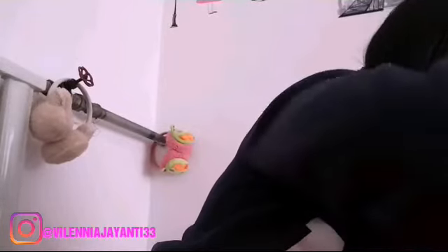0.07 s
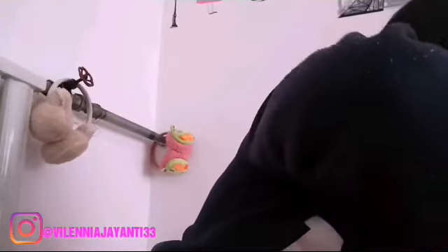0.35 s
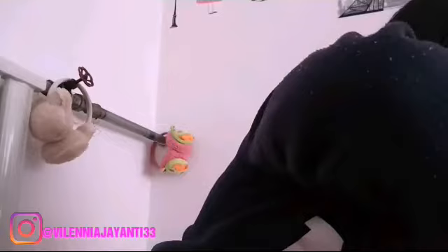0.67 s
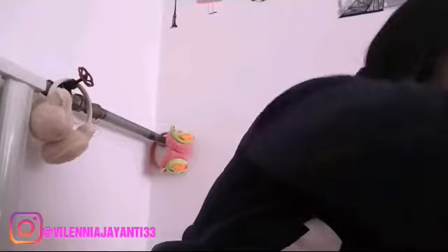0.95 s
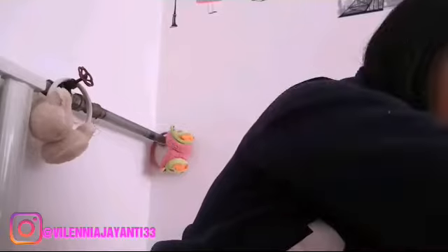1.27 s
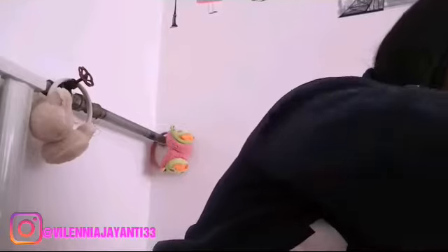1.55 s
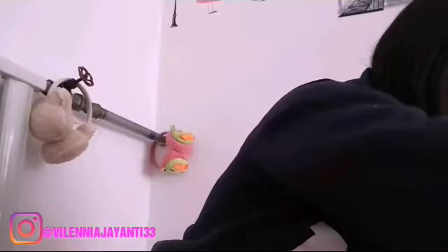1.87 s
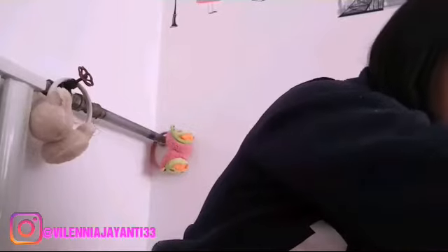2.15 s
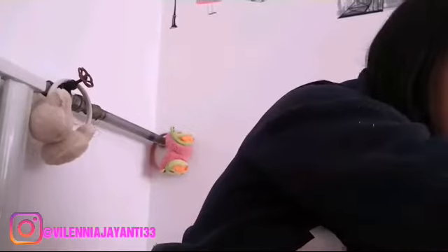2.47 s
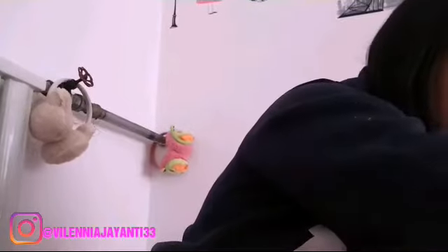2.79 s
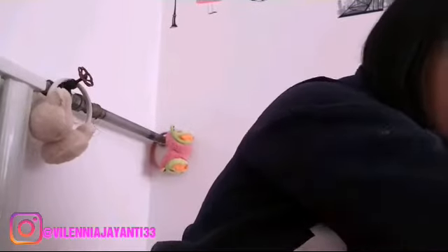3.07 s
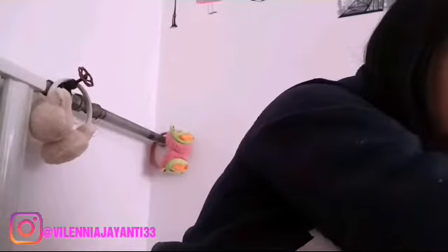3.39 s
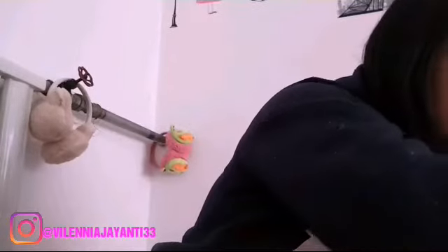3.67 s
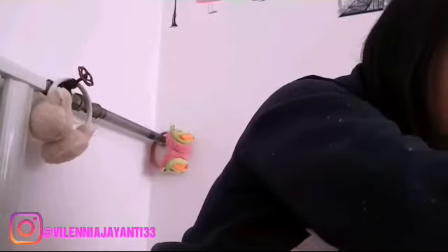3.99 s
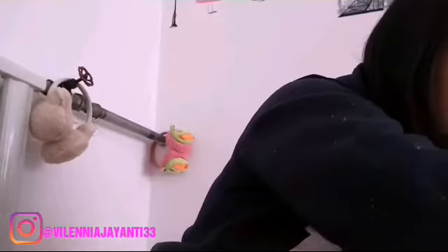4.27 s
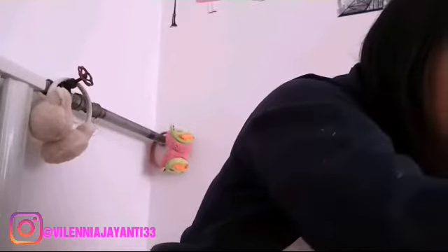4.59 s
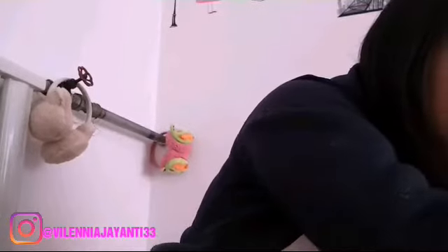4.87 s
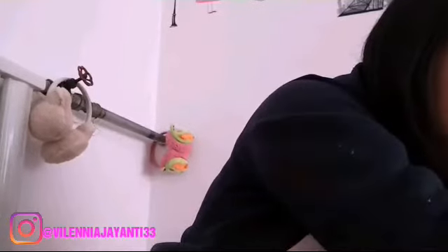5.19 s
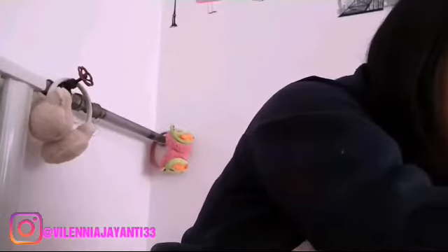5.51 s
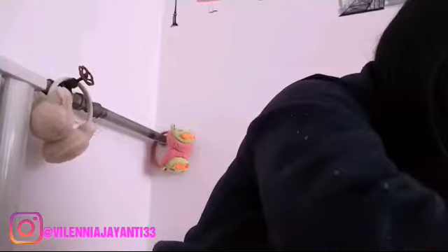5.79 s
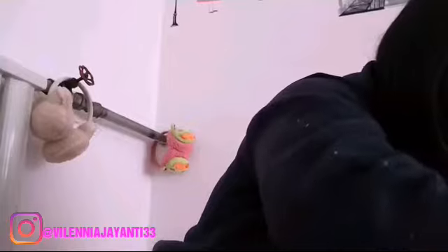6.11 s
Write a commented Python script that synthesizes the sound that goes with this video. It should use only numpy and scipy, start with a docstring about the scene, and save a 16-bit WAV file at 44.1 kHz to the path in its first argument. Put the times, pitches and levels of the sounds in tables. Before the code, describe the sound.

Light, irregular clicks and rattles come from makeup brush handles being pushed around in a container, mixed with soft shuffling and hollow bumps. A brief first stir leads to a longer, denser search, then a short lull and one more flurry that thins into lighter taps. Each click bounces off the walls of a small room, picked up with softened treble and a faint steady hiss.

```python
"""Light clicks and shuffling: someone rummages through makeup brushes in a container.
Hard handles hit each other and ring briefly, or slide with a short scrape. The container gives dull,
hollow knocks, and its contents rustle as the hand stirs them in three spells.
The room is small and bare: a wall throws each click back and the sound rings on over a faint hiss."""
import sys
import numpy as np
from scipy import signal
from scipy.fft import rfft, irfft, next_fast_len
from scipy.io import wavfile
from scipy.ndimage import uniform_filter1d, map_coordinates

SR = 44100
rng = np.random.default_rng(int(sys.argv[2]) if len(sys.argv) > 2 else 0)


def generate_wav(sig):
    """Save sig (samples, or channels by samples) to the path in sys.argv[1] as 16-bit PCM at SR."""
    pcm = np.round(np.clip(np.atleast_2d(sig).T, -1, 1) * 32767).astype(np.int16)
    wavfile.write(sys.argv[1], SR, pcm)


N = 275402

# Handles hitting each other, and a few strong echoes. Each has three tones; room_db adds echo and reverb.
# time_s, low_hz, low_db, middle_hz, middle_db, high_hz, high_db, room_db
HANDLE_HITS = [(0.1438, 2000, -81, 2280, -70, 4480, -58.5, 8),
               (0.2122, 1400, -61.0, 2250.0, -56, 4000, -52, -2),
               (0.2243, 1460, -55.5, 2540.0, -77, 3920, -74, 10.5),
               (0.2689, 1550, -39, 2400, -47.5, 3830, -59, -2.5),
               (0.2746, 1500, -45, 2330.0, -49, 4200, -41.5, -1.5),
               (0.2833, 1350, -42, 2900, -56.5, 3630, -57, -5),
               (0.3, 1570.0, -61.0, 2350, -46.5, 4500, -45.5, -6),
               (0.311, 1600, -57, 2840, -49, 4400, -46, 1), (0.441, 1900, -57.5, 2400, -55, 4400, -59, 8.5),
               (0.4518, 1610, -51, 2740, -53, 4500, -65, 3),
               (0.4884, 1780, -40.5, 2280, -42, 4250, -65, -3),
               (0.5493, 2020, -30.5, 2500, -40, 4900, -44, -10),
               (0.5642, 1860, -32, 2580, -39, 4700, -37, -10),
               (0.639, 1820, -42.5, 2400, -44, 4400, -47.5, -3),
               (0.684, 1830, -73, 2950, -55.5, 4300, -56.5, 3),
               (0.7012, 1820, -60, 2700, -61, 4430, -67, -9),
               (0.772, 1660, -70.0, 2560, -59, 4390.0, -70, -8),
               (0.9331, 1800, -54.5, 2800, -48.5, 4000, -55, 0),
               (0.9663, 1870, -66, 2350, -51, 4740, -56, -2),
               (0.9715, 1520, -53.5, 3130, -52, 4430, -48.5, -14),
               (0.9852, 1515, -54, 3150, -52.5, 4000, -55, -2.5),
               (1.0643, 1600.0, -81, 2760, -68, 4420, -62, 0),
               (1.08, 1870.0, -83, 2440, -66, 3800, -65, -8),
               (1.2427, 1540, -83, 2450.0, -69, 5130, -62, 0), (1.2913, 1730, -80, 2450, -80, 4440, -56, 3),
               (1.318, 1480, -44, 2640, -54, 4300, -45.5, 5.5),
               (1.3289, 1324, -44, 2440, -48.5, 4300, -52, 7.5),
               (1.3596, 1890, -66, 2550, -40, 3960, -37.5, -2),
               (1.3755, 1990, -44, 2230, -59, 4570.0, -46, -8),
               (1.4476, 1560, -68, 2280, -68, 4150, -47, -11),
               (1.4797, 1530, -44, 2380, -50, 3960.0, -56, 3),
               (1.509, 1510, -37, 2110, -40, 4350, -54, 1.5),
               (1.5133, 1250, -50.5, 2450, -56, 4020, -42.5, 9),
               (1.5228, 1550, -38, 2400, -56, 4360, -54, -7), (1.5377, 1770, -46, 2520, -41, 4250, -57, -4),
               (1.5435, 1770, -44, 2370, -42, 4500, -56, -6),
               (1.6226, 1570, -38.5, 2380, -37.5, 3900, -39, 4),
               (1.6291, 1820, -34.5, 2870, -38, 4300, -25.5, -8),
               (1.655, 1680, -45, 2470, -50, 4200, -45, -2), (1.659, 1780, -46, 2440.0, -44, 3940, -32, 1),
               (1.729, 1760, -33, 2340, -36.5, 4420, -30, -9.5),
               (1.7451, 1750, -34.5, 2400, -41, 3670.0, -44, -6),
               (1.7697, 1710, -41.5, 2470, -44, 4040, -44, 0),
               (1.8416, 1740, -46, 2300, -40, 3880, -56, -11),
               (1.8538, 1450, -42.5, 2320, -44, 4220, -58, 6),
               (1.872, 1930, -41, 2420, -53, 4560, -42, 1.0),
               (1.8766, 1410, -40, 2470, -39.5, 4030, -35, 4), (1.91, 1430, -59, 3120, -40, 4130, -47, 2),
               (2.0273, 1890.0, -51, 2400, -48, 4280, -50.5, 1),
               (2.1303, 1527, -32, 2090, -31, 3840, -39, -4), (2.1458, 1770, -31, 2320, -50, 3550, -37, -4),
               (2.153, 1780, -42, 2300, -51, 3660, -55, -5), (2.1646, 1580, -40, 2200, -48, 3750, -45, -1),
               (2.2277, 1400, -46.5, 2430.0, -50, 3760, -39, -1.5),
               (2.2894, 1503, -35.5, 2240, -32.5, 4270, -29, -5),
               (2.304, 1510, -37, 2350, -50, 4400, -47, -4.5),
               (2.3387, 1380, -57, 2400, -61, 3940, -38.5, -3),
               (2.4813, 1720, -59.0, 2750, -48, 3880, -36.5, -14),
               (2.4954, 1790, -46, 3180, -41, 3900, -57, -1), (2.55, 1800, -47, 2780, -47, 4680, -38, -1),
               (2.572, 1780, -38.5, 2290, -39.5, 4320.0, -45, -2),
               (2.5842, 1640, -45, 2660.0, -48, 3990, -34, -1),
               (2.6132, 1880.0, -59, 2730, -40, 3870, -42, 6),
               (2.6204, 1920, -48, 2520, -43, 3980, -28, -7), (2.623, 1900, -46, 2670, -49, 4110, -26, -4),
               (2.63, 1490, -41, 2700, -47, 4550, -39, -1),
               (2.6382, 1540, -40.5, 2680, -41, 4170, -40.5, 4.5),
               (2.7289, 2000, -38, 2400, -40.5, 4100, -43, -5),
               (2.801, 1780, -45, 2510.0, -57, 4400, -68, -1),
               (2.8478, 1980, -32, 2580.0, -32, 3870, -33, -4),
               (2.8571, 1700, -33, 2370, -31.5, 4190, -26, -7),
               (2.8634, 1660, -67, 2800, -36, 3590, -31.5, 2),
               (2.8741, 1470, -36.5, 2820, -45, 4150, -34, -4.5),
               (2.9428, 1950, -72, 2760, -52, 3820, -37.5, 4),
               (3.1161, 1500, -42.5, 2360, -48, 4300, -44.5, 1),
               (3.145, 1760, -43.5, 2330, -57, 4330, -63, -4), (3.17, 1840, -65, 2540, -32, 3920, -26, -4),
               (3.1868, 1900, -58, 3330, -29, 3600, -37, -2),
               (3.3243, 1695, -43.5, 2360.0, -50, 4300, -62, 9.5),
               (3.329, 1370, -40.5, 2640, -58, 4460, -66, 5),
               (3.3424, 1400, -33.5, 2480, -39, 4600, -66, 3),
               (3.3507, 1250, -42, 2670, -42, 3470, -54, -2),
               (3.3574, 1470, -31.5, 2970, -50, 3540, -52, -9),
               (3.408, 1230, -41.5, 2740, -46, 3660, -36.5, 2.5),
               (3.528, 1530, -44.5, 2500, -51, 4350, -50, -3),
               (3.569, 2060, -47.5, 2450.0, -51, 4500, -50, -10),
               (3.645, 1390, -64, 2530, -69, 4460, -51.5, 2.5),
               (3.7363, 1500, -64, 2470, -67, 4350, -60, 3), (3.7827, 1410, -62, 2440, -61.5, 4030, -60, 7),
               (3.815, 1450, -48, 2720, -58.5, 4320, -38, -4),
               (3.855, 1390, -61, 2680, -40.5, 4010, -37, 6),
               (3.8737, 1650, -48, 2530, -37, 4200, -35, -12),
               (3.9045, 1990, -40, 2270, -37, 4050, -29.5, -3.5),
               (4.1212, 1690, -84, 3000, -47.5, 4370, -49, -2),
               (4.1791, 2000, -61, 2530, -55, 3930, -68.5, 2), (4.326, 1530, -91, 2640, -64, 3860, -63, 3),
               (4.3402, 2036, -79.5, 2340.0, -68, 4020, -62, -8),
               (4.6918, 1480, -51.5, 2430, -53, 4700, -47, 5.5),
               (4.7224, 1940, -48, 2670.0, -47, 3540, -47, -6.0),
               (4.7273, 1930.0, -64, 2320, -42.5, 3920, -36.5, -4.5),
               (4.823, 1840, -55.5, 2400, -60, 3960.0, -64, -5),
               (4.873, 1550, -49.5, 2400, -79, 4630, -49.5, -10),
               (4.887, 1320, -51, 2260.0, -89, 4130, -60, -1),
               (4.9125, 1730, -56, 2380, -67, 5220, -52.5, 1),
               (4.95, 1820, -56, 2300, -61, 4220, -43.5, -1.5), (5.016, 1810, -72, 2630, -57, 5280, -53, 0),
               (5.066, 1890.0, -67, 2800, -66, 4890, -43, -4.5),
               (5.133, 1400, -51, 2300.0, -57, 4400, -64, 5), (5.1434, 1480, -58, 2620, -72, 4470, -47, -5),
               (5.163, 1890, -57, 2250.0, -58, 4660, -53, 4),
               (5.2075, 1600, -54, 2220, -56, 4140, -43.5, 3),
               (5.237, 1430, -52, 2630, -34.5, 4430, -31.5, 1.5),
               (5.252, 1400, -35, 2430, -43, 4460, -44, -2), (5.2572, 1510, -54, 2830, -44, 4600, -35, -17),
               (5.274, 1540, -40, 2720, -31, 4100, -26.5, -11),
               (5.29, 1420, -40, 2760, -47, 4000, -51, -1.5),
               (5.3055, 1550, -38, 2650, -40.5, 4300, -55, -1),
               (5.4427, 1400.0, -57, 2400, -64, 3700, -44.5, -20),
               (5.4563, 1820, -61, 2750.0, -53, 3770, -43, -19),
               (5.484, 1570, -40, 2680, -50, 3880, -32.5, -5),
               (5.498, 1505, -37.5, 2700, -49, 4100, -49, -1.5),
               (5.5339, 1490, -48, 2820, -48, 4470.0, -55, 4),
               (5.8289, 1980, -51, 2660, -42, 3730, -47, 3.5),
               (5.832, 1970.0, -53, 2520, -51, 4040, -43, -2.0),
               (5.841, 1700, -63, 2480, -63, 4380, -42.5, -14),
               (5.8648, 1700, -68, 2710.0, -62, 4700, -42, -1),
               (5.881, 1560.0, -69, 3070, -49, 4140, -51, 0),
               (5.9062, 1840, -66, 2770, -44, 4840, -38.5, -3.5),
               (5.924, 1750, -58, 2370, -55, 4280, -44, 4.5),
               (6.02, 1700, -75, 2280, -46, 3900.0, -43, -16),
               (6.0651, 1830.0, -69, 2440, -52, 3800, -47, -19),
               (6.0804, 2020, -57.5, 2300, -51, 4010.0, -65, 2),
               (6.1261, 1770, -67, 2500, -63, 4200, -41, -9)]
# The tones at which the hollow container rings: pitch_hz, width_hz, level_db
CONTAINER_TONES = [(135, 41, -6.5), (203.4, 26, -2), (271, 50.5, -3.5), (353, 91, 0), (483, 353, -5.5),
                   (831, 132, -4.5), (1390, 410, -9.5)]
# The tones at which the loose handles ring: pitch_hz, width_hz, level_db
HANDLE_TONES = [(1386, 138, -8), (2005, 260, -3), (2740, 1840, -5), (3725, 676, 1), (4696, 383, -1.5)]
TYPICAL_HIT_DB = -40  # hits count as hard or soft compared with this


def amp(db):
    """Turn decibels into a gain to multiply by."""
    return 10 ** (np.asarray(db) / 20)


def unit(x):
    """Scale x to an average (rms) level of 1."""
    return x / np.sqrt(np.mean(x ** 2) + 1e-20)


def levelled(x, span_s):
    """Give x the energy of a sound that holds level 1 for span_s."""
    return x / np.sqrt(np.sum(x ** 2) / (span_s * SR) + 1e-20)


def along(points, hz):
    """Read between (pitch_hz, value) points on a log pitch scale."""
    pitches, values = np.transpose(points)
    return np.interp(np.log(hz + 1), np.log(pitches), values)


def add(track, start_s, sound):
    """Mix a sound into the track."""
    i = max(round(start_s * SR), 0)
    track[i:i + len(sound)] += sound[:len(track[i:])]


def filtered(x, response):
    """Multiply each frequency in x by response(hz)."""
    size = next_fast_len(len(x) + 8192)
    return irfft(rfft(x, size) * response(np.fft.rfftfreq(size, 1 / SR)), size)[:len(x)]


def resonate(x, tones):
    """Pass x through an object that rings at these (pitch_hz, width_hz, level_db) tones."""
    return filtered(x, lambda f: sum(
        (-1) ** k * amp(db) * 1j * f * width / (hz * hz - f * f + 1j * f * width)
        for k, (hz, width, db) in enumerate(tones)))


def cut_bass(x, corner_hz=800):
    """Small objects give off little bass."""
    return signal.sosfilt(signal.butter(2, corner_hz, "highpass", fs=SR, output="sos"), x)


def causal(gain):
    """A filter with this gain that never rings ahead of the sound (minimum phase)."""
    cepstrum = irfft(np.log(np.maximum(gain, 1e-6)))
    half = len(cepstrum) // 2
    cepstrum[1:half] *= 2
    cepstrum[half + 1:] = 0
    return np.exp(rfft(cepstrum))


def ring(hz, fade_s, attack_s, t):
    """A tone that starts softly and falls 60 dB in fade_s."""
    tone = np.sin(2 * np.pi * (hz * t + rng.random()))
    return tone * amp(-60 * t / fade_s) * (1 - np.exp(-t / attack_s))


def burst(hz, swell_s, t):
    """A tone only a few cycles long, loudest at twice swell_s."""
    tone = np.sin(2 * np.pi * (hz * t + rng.random()))
    return tone * (t / swell_s) ** 2 * np.exp(-t / swell_s)


def ticks(per_s, spread_db):
    """Tiny touches of uneven size at random times."""
    size = amp(spread_db * np.minimum(rng.standard_normal(N), 2))
    return (rng.random(N) < per_s / SR) * size * rng.choice([-1, 1], N)


def wobble(per_s):
    """A smooth curve through per_s random values a second."""
    return map_coordinates(rng.standard_normal(1024), [np.arange(N) * per_s / SR], mode="wrap")


def air():
    """The still room's faint, steady hiss."""
    # The colour of the hiss: pitch_hz, level_db
    hiss_colour = [(25, -1), (120, -1.5), (300, -5), (900, -15.5), (1500, -15), (3000, -13.5), (4400, -1),
                   (5500, -24.5), (8000, -6.5), (14000, -2)]
    return amp(-67.0) * unit(filtered(rng.standard_normal(N), lambda hz: amp(along(hiss_colour, hz))))


def room_tail(clump_db=3):
    """Reverb: reflections arrive in clumps, and each pitch fades at its own speed."""
    # How long the room takes to fade by 60 dB: pitch_hz, fade_s
    fade_times = [(120, 0.3), (400, 0.31), (1500, 0.42), (4000, 0.31), (7000, 0.47), (9500, 0.25)]
    hz, t, spectrum = signal.stft(rng.standard_normal(int(SR * .8)), SR, nperseg=256)
    tail = signal.istft(spectrum * amp(-60 * t / along(fade_times, hz)[:, None]), SR, nperseg=256)[1]
    # little comes back before the nearest walls answer
    tail *= np.interp(np.arange(len(tail)) / SR, [0, .012, .017, .035], [.3, .35, .85, 1])
    tail *= amp(clump_db * unit(uniform_filter1d(rng.standard_normal(len(tail)), size=90)))
    return tail / np.linalg.norm(tail)


def in_room(x, reverb_db):
    """Add reverb to x; every spot in the room has a different tail."""
    response = amp(reverb_db) * room_tail()
    response[0] += 1
    return signal.fftconvolve(x, response)


def scatter(spread_s, share):
    """The direct path, then a spray of reflections off nearby surfaces."""
    t = np.arange(SR // 50) / SR
    spray = rng.standard_normal(len(t)) * np.exp(-t / spread_s) * (1 - np.exp(-t / spread_s)) ** 2
    path = share * spray / np.linalg.norm(spray)
    path[0] += 1
    return path


def rolling(x, depth_db=3.5):
    """As the handles roll and touch elsewhere, their tones come and go."""
    spectrum = signal.stft(x, nperseg=512)[2]
    drift = uniform_filter1d(rng.standard_normal(spectrum.shape), size=4, axis=0)  # smooth over pitch
    drift = uniform_filter1d(drift, size=8, axis=1)  # and over time
    return unit(signal.istft(spectrum * amp(depth_db * unit(drift)), nperseg=512)[1][:N])


def jostle(per_s, spread_db, swell_s, detune=.09):
    """Light taps, each on a handle of a slightly different pitch."""
    track, t = np.zeros(N), np.arange(SR // 80) / SR
    for start_s in np.arange(0, N / SR, 1 / per_s):
        hz, _, db = HANDLE_TONES[rng.integers(len(HANDLE_TONES))]
        size = amp(db + spread_db * min(rng.standard_normal(), 1.5))
        late_s = rng.random() / 20
        pitch_hz = hz * (1 + detune * rng.uniform(-1.6, 1))
        add(track, start_s + late_s, size * burst(pitch_hz, swell_s, t))
    return unit(track)


def nudges(t, rise_s=0.0036, fall_s=0.0063, growth=0.94):
    """A gain that peaks around each hit, as it disturbs the handles next to it."""
    gain = np.zeros(N)
    around = t[:SR // 8] - t[SR // 16]
    shape = np.exp(np.where(around < 0, around / rise_s, -around / fall_s))
    for time_s, *tones, _ in HANDLE_HITS:
        force_db = max(tones[1::2]) - TYPICAL_HIT_DB
        # growth below 1 gives soft hits a larger share of scrape
        add(gain, time_s + around[0], amp(growth * force_db) * shape)
    return gain


def shuffle(fidget_db=1):
    """The hand drags handles over each other and along the container, resting between spells."""
    # Three spells of stirring, each a list of: time_s, container_db, handles_db
    spells = [
        [(0, -90, -67), (.13, -73, -58), (.236, -51, -62.5), (.37, -93, -67), (.508, -69.5, -50),
         (.76, -62.5, -63.5)],
        [(1.14, -106, -74), (1.37, -60, -61), (1.52, -52.5, -47), (1.79, -53.5, -42.5), (2.08, -58, -60.5),
         (2.68, -48, -39.5), (2.8, -63.5, -52), (3.08, -68.5, -54), (3.39, -47, -42.5), (3.59, -55.5, -53),
         (3.72, -79, -66), (3.95, -49, -44.5), (4.12, -73, -59.5), (4.41, -79.5, -66)],
        [(4.61, -77.5, -69), (4.7, -64.5, -57.5), (4.95, -69, -59), (5.25, -49.5, -51.5), (5.55, -68.5, -48),
         (5.7, -60, -60), (5.88, -59.5, -64), (6, -57, -53.5), (6.24, -84, -58)],
    ]
    t, container_gain, handle_gain = np.arange(N) / SR, 0, 0
    for spell in spells:
        times, container_db, handles_db = np.transpose(spell)
        moving = (t >= times[0]) & (t <= times[-1])
        container_gain += moving * amp(np.interp(t, times, container_db))
        handle_gain += moving * amp(np.interp(t, times, handles_db))
    fidget = amp(fidget_db * wobble(per_s=22.04))  # the hand is unsteady
    nudge = nudges(t)
    container_gain = container_gain * fidget + amp(-56.5) * nudge
    handle_gain = handle_gain * fidget + amp(-46) * nudge
    rub = amp(-6.5) * rolling(resonate(ticks(per_s=600, spread_db=9.5), CONTAINER_TONES))
    scrape = amp(-8.0) * rolling(resonate(ticks(per_s=340, spread_db=3.5), HANDLE_TONES))
    taps = amp(-17.0) * jostle(per_s=260, spread_db=5, swell_s=.0006)
    stray_taps = amp(-19.5) * jostle(per_s=30, spread_db=3, swell_s=.0005)
    return in_room(container_gain * rub + handle_gain * (scrape + taps + stray_taps), reverb_db=-2.0)[:N]


def slides(width_hz=520):
    """One handle sticks and slips along another, which keeps one of its tones sounding."""
    # Short sliding strokes: start_s, length_s, pitch_hz, level_db
    strokes = [(0.039, 0.12, 1520, -70.5), (0.364, 0.094, 1050, -68), (0.422, 0.054, 795, -59),
               (1.181, 0.097, 1680, -66), (0.917, 0.043, 3000, -60), (1.301, 0.054, 2040, -52),
               (3.141, 0.027, 1730, -49.5), (4.856, 0.058, 1460, -59), (4.852, 0.04, 770, -60.5),
               (4.893, 0.08, 1040, -60), (5.159, 0.19, 1410, -48.5)]
    track = np.zeros(N)
    for start_s, length_s, hz, db in strokes:
        count = int(length_s * SR)
        slips = ticks(per_s=690, spread_db=-1.0)[:count]
        tone = [(hz, width_hz, 0)]
        scrape = unit(resonate(resonate(slips, tone), tone))
        add(track, start_s, amp(db) * np.hanning(count) * scrape)
    return in_room(track, reverb_db=-5.5)[:N]


def knocks(swell_cycles=0.56, fade_s=0.13):
    """A bump pushes the container for a few low cycles and shakes its hollow tones."""
    # Bumps on the container: time_s, pitch_hz, push_db, hollow_db
    bumps = [(0.172, 315, -52, -54), (0.214, 284, -52, -64), (0.271, 322, -50.5, -51), (.31, 277, -55, -79),
             (.509, 293, -39.5, -45), (0.563, 497, -52, -67), (.94, 200, -65.5, -62),
             (1.338, 336, -40.5, -43.5), (1.359, 261, -40, -48.5), (1.518, 300, -43, -49.5),
             (1.543, 184, -42, -58), (1.622, 310, -44.5, -55), (1.65, 334, -44, -46), (1.77, 540, -41, -48),
             (1.834, 343, -57, -45.5), (1.879, 337, -45, -50), (1.93, 354, -46.5, -52),
             (2.129, 500, -48, -47), (2.314, 219, -42, -53), (2.453, 298, -46.5, -50.5),
             (2.552, 326, -49.5, -51), (2.691, 250, -55, -55.5), (2.859, 580, -46.5, -67),
             (2.942, 378, -44, -43.5), (3.207, 306, -50.5, -55), (3.333, 280, -41, -40.5),
             (3.352, 300, -44, -36.5), (3.381, 238, -43.5, -50), (3.55, 294, -55, -54),
             (3.814, 330, -63, -56), (3.854, 370, -36.5, -37.5), (3.907, 286, -50.5, -45),
             (3.946, 407, -60, -46.5), (3.99, 200, -52, -50), (4.04, 241, -65, -58),
             (4.706, 224, -50.5, -52), (4.826, 330, -64.5, -61), (5.253, 296, -39.5, -45.5),
             (5.295, 340, -48.5, -73), (5.457, 320, -49.5, -77), (5.495, 305, -53, -45.5),
             (5.758, 347, -64, -74), (5.875, 404, -50.5, -57), (5.929, 290, -52, -66),
             (6.098, 135, -57.5, -66)]
    track, t = np.zeros(N), np.arange(SR // 8) / SR
    for time_s, hz, push_db, hollow_db in bumps:
        swell_s = swell_cycles / hz
        push = amp(push_db) * levelled(burst(hz, swell_s, t), span_s=0.0027)
        shake = rng.standard_normal(len(t)) * amp(-60 * t / fade_s)
        hollow = amp(hollow_db) * levelled(resonate(shake, CONTAINER_TONES), span_s=0.006)
        add(track, time_s - swell_s, in_room(cut_bass(push + hollow, corner_hz=75), reverb_db=-3.5))
    return track


def rings(attack_s=0.00026):
    """After a blow, a loose handle or the container holds one note for a moment."""
    # Notes that ring on freely: start_s, pitch_hz, level_db, fade_s
    notes = [(0.267, 1580, -36, 0.039), (.5, 3410, -46, 0.27), (.55, 3470, -47, 0.32),
             (.638, 1814, -36.5, 0.032), (1.361, 129, -40.5, 0.068), (1.655, 141, -40, 0.043),
             (1.77, 572, -29.5, 0.017), (2.606, 202, -46, 0.1), (2.621, 6820, -32.5, .035),
             (2.939, 3150, -49, 0.36), (3.186, 3440, -41, 0.055), (3.356, 197, -40, 0.12),
             (3.856, 1322, -44, 0.13), (3.909, 1120, -40.5, 0.055), (5.249, 148, -40.5, 0.061),
             (5.273, 2720, -27, .039), (5.274, 4300, -24, .008), (5.287, 1440, -34.5, 0.08),
             (5.288, 1315, -45, 0.094), (6.1243, 4660, -31, 0.013)]
    track, t = np.zeros(N), np.arange(SR // 2) / SR
    for start_s, hz, db, fade_s in notes:
        add(track, start_s, in_room(amp(db) * ring(hz, fade_s, attack_s, t), reverb_db=-5.5))
    return track


def clicks(swell_s=.00047, note_db=-4.5, grate_db=-10, crack_db=-9, hardness=0.44, echo_delay_s=0.012):
    """Each hit rings three short tones of a handle with a sharp crack, and a wall throws it back."""
    track, t = np.zeros(N), np.arange(SR // 40) / SR
    rise_s = 2 * swell_s
    for time_s, *tones, room_db in HANDLE_HITS:
        pitches, levels = tones[::2], tones[1::2]
        path, click = scatter(spread_s=.0015, share=.28), 0
        for hz, db in zip(pitches, levels):
            strike = unit(burst(hz, swell_s * np.sqrt(2000 / hz), t))  # higher tones are quicker
            note = amp(note_db) * unit(ring(hz, fade_s=.024, attack_s=rise_s, t=t))
            tone = signal.fftconvolve(strike + note, path)[:len(t)]
            click += amp(db) * levelled(tone, span_s=0.0037)
        grate_noise, crack_noise = rng.standard_normal((2, len(t))) * t * np.exp(-t / rise_s)
        # the handles grate as they touch, which fills the gaps between the tones
        grate = cut_bass(resonate(grate_noise, HANDLE_TONES))
        click += amp(max(levels) + grate_db) * levelled(grate, span_s=0.012)
        # harder blows touch for less time, so they have more treble
        force_db = max(levels) - TYPICAL_HIT_DB
        treble = levelled(np.diff(crack_noise, prepend=0), span_s=0.013)
        crack = amp(levels[-1] + crack_db + hardness * force_db) * treble
        start_s = time_s - rise_s
        add(track, start_s, in_room(click, reverb_db=room_db - 3.4))
        add(track, start_s, in_room(crack, reverb_db=-10))
        echo = signal.fftconvolve(click + crack, scatter(spread_s=.0016, share=.7))
        add(track, start_s + echo_delay_s, amp(room_db - 10) * echo)
    return track


def scene():
    """All the sounds together in one channel."""
    return (clicks() + rings() + knocks() + slides() + shuffle() + air())[None]


def record(dry, top_hz=15400):
    """A small microphone that is dull above 5 kHz and passes nothing above top_hz."""
    # How strongly the microphone picks up each pitch: pitch_hz, gain_db
    mic_colour = [(20, -1.5), (100, 3), (1000, 0.5), (4700, -4), (5500, -3), (6800, -9.5), (8200, -26),
                  (10000, -30.5), (12000, -29), (15000, -45.5)]
    return filtered(dry[0], lambda hz: causal(amp(along(mic_colour, hz))) * (hz < top_hz))[None]


dry = scene()
out = record(dry)
generate_wav(out)
```